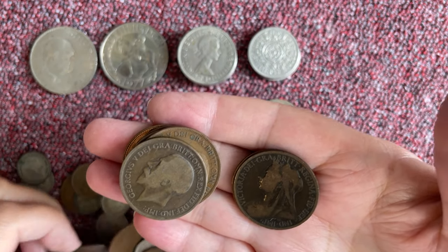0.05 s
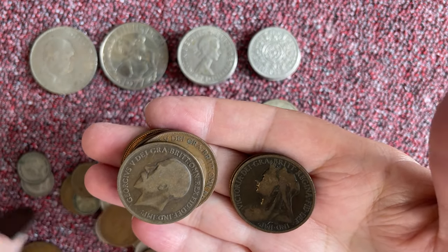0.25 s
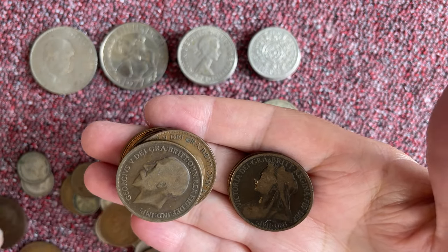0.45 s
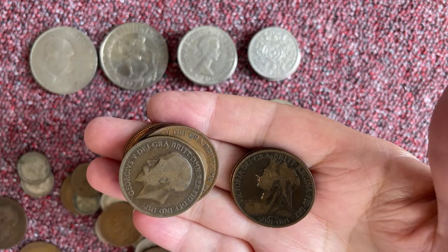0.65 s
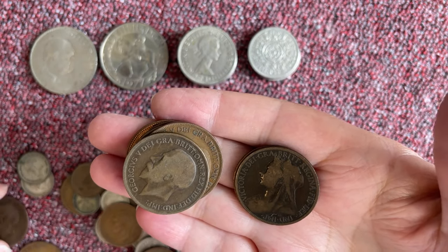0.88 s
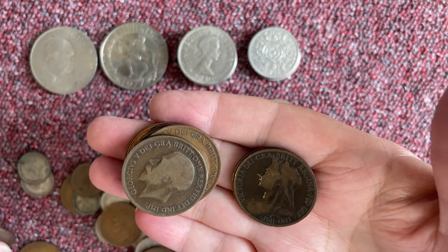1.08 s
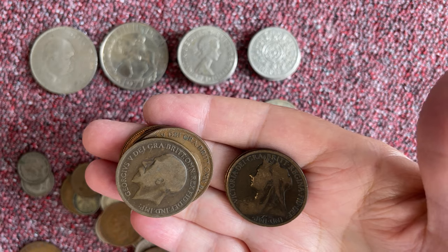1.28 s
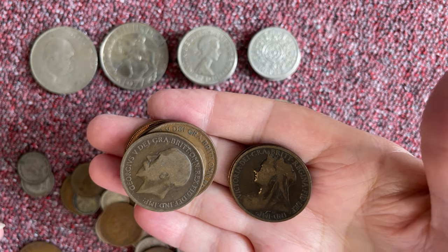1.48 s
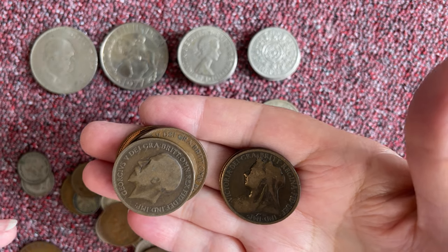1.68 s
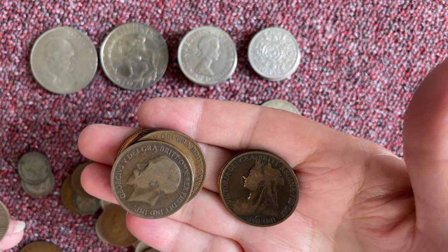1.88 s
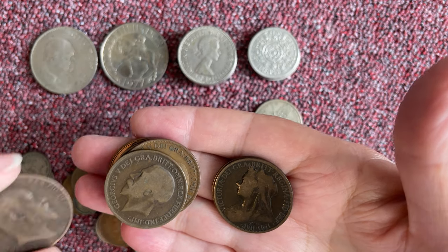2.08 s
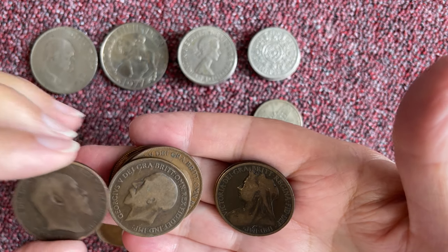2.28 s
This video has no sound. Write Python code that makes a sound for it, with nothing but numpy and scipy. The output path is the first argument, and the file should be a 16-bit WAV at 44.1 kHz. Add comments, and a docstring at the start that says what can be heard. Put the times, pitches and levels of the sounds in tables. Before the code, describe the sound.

Coins clink once, brightly, and settle as fingers slide a coin off a small heap. A hand bumps the carpet with two dull thuds, then faint handling ticks and rubs follow, close up in a quiet room.

```python
"""Penny off a coin heap

Fingers slide an old penny off a heap of coins on a carpet, close up in a quiet room. The heap slips
with one bright clink, and its coins stop each other as they settle. The freed penny rings faintly,
the hand bumps the carpet with two clear thuds, and a few handling ticks and rubs follow."""
import sys
import numpy as np
from scipy import signal
from scipy.fft import irfft
from scipy.io import wavfile

SR = 44100
rng = np.random.default_rng(int(sys.argv[2]) if len(sys.argv) > 2 else 0)


def put_to_file(sound):
    """Save the sound as 16-bit audio at rate SR, in the file named by the first command-line argument."""
    columns = np.atleast_2d(sound).T  # one column per channel
    safe = np.clip(columns, -1, 1)
    whole_steps = np.round(safe * 32767)
    wavfile.write(sys.argv[1], SR, whole_steps.astype(np.int16))


N = 108045
T = np.arange(N) / SR

# Modes of the four clinking coins, before each coin's trim: pitch_hz, level_db, t60_s
COIN_1_MODES = [(6735, -35, .22), (6983, -32, .2), (7120, -41, .15), (14392, -26, .06), (14728, -25, .22),
                (14796, -19, .35), (14987, -26, .12)]
COIN_2_MODES = [(8296, -41, .1), (8534, -34, .12), (11822, -28, .22), (12330, -21, .25), (12440, -32, .3),
                (12685, -32, .3), (12785, -35, .25), (15665, -26, .14)]
COIN_3_MODES = [(12292, -39, .3), (15390, -42, .3), (15462, -29, .35)]
COIN_4_MODES = [(11393, -49, .36), (12236, -43, .36), (12368, -37, .36), (12602, -47, .36),
                (12815, -48, .36)]
# Hard hits inside the heap: start_s, level_db, t60_s
HEAP_HITS = [(.2010, -56, .03), (0.2088, -36, .04), (0.2152, -15.5, .012), (0.2173, -14.5, 0.014),
             (0.2197, -20, .012), (0.2203, -19.5, 0.021), (0.2324, -27.5, .03), (0.2412, -27.5, .03),
             (.2485, -27, .02), (0.2544, -21.5, .04), (.2590, -27.5, .025), (.274, -42.5, .04),
             (0.288, -31, .03), (.2900, -38.5, .035), (.3990, -52, .012)]
# Their bright tone: freq_hz, gain_db
HEAP_HIT_EQ = [(100, -50.5), (350, -26.5), (700, -25), (1100, -30), (1700, -46), (2700, -37), (3900, -42),
               (5200, -27), (6100, -30.5), (6900, -11.5), (7800, -23), (9200, -12.5), (10000, -16),
               (11200, -15), (12400, -8.5), (13400, -12.5), (14800, -2.5), (16000, -10.5)]
# Modes of the penny: pitch_hz, relative_level_db, t60_s
PENNY_MODES = [(5324, -20, .7), (9265, 0, .32), (12205, -5, .3)]
# Light touches that leave it ringing: start_s, level_db, damped_after_s
PENNY_TAPS = [(.412, -69, 0.048), (.427, -63, 0.0048), (.485, -70, 0.059), (.5268, -58.5, 0.32)]
# Its rim catching as it slides: start_s, level_db
RIM_CATCHES = [(0.061, -54.5), (.0675, -59), (0.07, -56.5), (.080, -49), (0.089, -55), (0.0954, -58.5),
               (.103, -60.5), (0.1184, -43), (.1365, -44), (0.138, -46.5), (.1452, -42), (0.151, -42.5),
               (.167, -48), (0.171, -46), (.174, -51.5)]
# Their thin, metallic tone: freq_hz, gain_db
RIM_EQ = [(300, -20.5), (800, -7), (1500, -21.5), (4500, -32.5), (5400, -15), (6500, -35), (8000, -3),
          (8800, 1.5), (9250, 9), (9800, -8.5), (11000, -13), (12350, -1.5), (13300, -9.5), (16000, -23.5)]
# Soft blows on the carpet: start_s, relative_level_db
CARPET_BUMPS = [(0.218, -2), (.335, -23.5), (0.5132, -15.5), (0.5196, 8), (0.5587, -3.5), (.9830, -20.5)]
# Their dull tone: freq_hz, gain_db
BUMP_EQ = [(40, -44.5), (80, -37.5), (125, -3), (200, -12.5), (300, -0.5), (450, 3), (750, -2),
           (1050, -13.5), (1500, -40), (3000, -57), (16000, -83.5)]
# Fingernail and handling ticks: start_s, level_db, tilt_db_per_octave, top_hz
FINGER_TICKS = [(.1133, -48.5, -0.5, 16200), (0.115, -52, 7, 16100), (.131, -52, 0.5, 5000),
                (.1665, -48, 4, 14790), (0.369, -51.5, -2.5, 9900), (0.3747, -50, -0.5, 10200),
                (0.7764, -58, 4, 7530), (.8506, -47.5, 2, 6500), (0.941, -55, 1.5, 15000),
                (0.945, -57, 2, 15000), (0.9823, -47, -0.5, 15000), (0.986, -47, -3, 14270),
                (1.1956, -53, 1.5, 15000), (1.211, -66, -0.5, 11900)]
# Their tone before tilt and roll-off: freq_hz, gain_db
TICK_EQ = [(100, -7.5), (300, -2), (700, -0.5), (1200, -8.5), (1900, -8), (3000, -19.5), (6000, -14.5),
           (10000, -15.5), (16000, -13)]
# Skin sliding on metal: centre_s, half_length_s, level_db
SKIN_RUBS = [(.09, 0.051, -63.5), (.465, 0.049, -63.5), (.89, 0.098, -71.5), (1.185, 0.052, -66.5),
             (2.06, .05, -81.5)]
# Its hissy tone: freq_hz, gain_db
RUB_EQ = [(300, 7.5), (2000, -5.5), (4500, -10.5), (5600, -5), (7800, 5), (10500, 0), (14000, 0),
          (16000, -2)]
# The hand brushing the carpet: centre_s, half_length_s, level_db
CARPET_BRUSHES = [(.12, .04, -75), (.9, 0.11, -74.5), (2.36, 0.21, -75)]
# Its muffled tone: freq_hz, gain_db
BRUSH_EQ = [(100, -10), (400, -5.5), (1000, -3.5), (1800, -17.5), (5000, -26.5), (16000, -47.5)]
# Reverb decay by band: freq_hz, t60_s
REVERB_DECAY = [(100, 0.33), (400, 0.33), (1000, .22), (4000, 0.22), (12400, 0.18), (14500, 0.14),
                (16000, 0.1)]
# Reverb tone: freq_hz, gain_db
REVERB_EQ = [(100, 4.5), (1000, -0.5), (5000, 4), (7000, -4), (10000, 0), (12500, 0), (13600, -1),
             (14800, -3), (15700, -2.5)]
# Bass-heavy room air: freq_hz, gain_db
AIR_EQ = [(12, -31), (20, -3.5), (65, -4), (77, -0.5), (93, -22), (172, -12.5), (198, -29), (234, -16),
          (270, -25.5), (293, -19.5), (558, -25.5), (1150, -29.5), (1530, -32.5), (3740, -34.5),
          (16000, -35.5)]
# Wavering room hum: pitch_hz, level_db
HUM_TONES = [(59.5, -71), (120, -81), (174, -80.5)]


def heap_clink():
    """Four coins are set ringing, chatter against the heap and settle one after another."""
    clink_s = .2163
    out = np.zeros(N)
    for modes, trim_db, stop_s in [(COIN_1_MODES, -.5, .249), (COIN_2_MODES, 1, .262),
                                   (COIN_3_MODES, 4, .294), (COIN_4_MODES, -4, .386)]:
        add(out, clink_s, amp(trim_db) * coin_ring(modes, stop_s - clink_s, rise_s=.002, rattle=.5))
    for start_s, level_db, t60_s in HEAP_HITS:
        add(out, start_s, amp(level_db) * contact(HEAP_HIT_EQ, t60_s))
    return out


def sliding_penny():
    """The penny scrapes along, damped by a finger, then rings as it comes free."""
    out = np.zeros(N)
    for start_s, level_db in RIM_CATCHES:
        add(out, start_s, amp(level_db) * contact(RIM_EQ, t60_s=.018))
    for start_s, level_db, damped_after_s in PENNY_TAPS:
        add(out, start_s, amp(level_db) * coin_ring(PENNY_MODES, damped_after_s, rise_s=.00035))
    return out


def coin_ring(modes, damped_after_s, rise_s, rattle=0):
    """A coin rings until something chokes it; rattling against its neighbours roughens each mode."""
    t = T[:SR // 2]
    tone = np.zeros(len(t))
    for pitch_hz, level_db, t60_s in modes:
        partial = np.exp(2j * np.pi * (pitch_hz * t + rng.random()))
        roughness = 1 + rattle * flutter(width_hz=170, size=len(t))
        tone += amp(level_db) * fade(t, t60_s) * (partial * roughness).real
    attack = np.minimum(t / rise_s, 1)
    choke = fade(t - damped_after_s, t60_s=.014)
    return tone * attack * choke


def contact(eq, t60_s, tilt_db=0, top_hz=SR):
    """One hard touch: a fast-dying cluster of tiny impacts, all of one tone."""
    click = pulse(eq, tilt_db, top_hz)
    impacts = rng.choice([-1., 1.], len(click)) * fade(T[:len(click)], t60_s)
    return signal.fftconvolve(impacts, click / np.linalg.norm(click))


def pulse(eq, tilt_db=0, top_hz=SR):
    """A single sharp-fronted impact, shaped by an EQ, a tilt per octave and a top roll-off."""
    hz = abs(np.fft.fftfreq(4096, 1 / SR))
    shape_db = curve(eq, hz) + tilt_db * np.log2(hz / 1000 + 1e-2)
    gain = amp(shape_db) / (1 + (hz / top_hz) ** 8)
    minimum_phase = np.exp(np.conj(signal.hilbert(np.log(gain))))
    return np.fft.ifft(minimum_phase).real


def carpet_thuds():
    """Dull pushes on the carpet, each with one near reflection and a faint low ring."""
    boom_hz, echo_s, echo_db = 355, .0027, -7
    push = -amp(-1.5) * pulse(BUMP_EQ)
    boom = amp(-56) * np.sin(2 * np.pi * boom_hz * T) * fade(T, t60_s=.26)
    out = np.zeros(N)
    for start_s, level_db in CARPET_BUMPS:
        add(out, start_s, amp(level_db) * push)
        add(out, start_s + echo_s, amp(level_db + echo_db) * push)
        add(out, start_s, amp(level_db) * boom)
    return out


def handling():
    """Small finger ticks, plus grainy swells of skin on metal and of the hand on the carpet."""
    grain_db = 4.5
    out = np.zeros(N)
    for start_s, level_db, tilt_db, top_hz in FINGER_TICKS:
        add(out, start_s, amp(level_db) * contact(TICK_EQ, t60_s=.011, tilt_db=tilt_db, top_hz=top_hz))
    for strokes, eq in [(SKIN_RUBS, RUB_EQ), (CARPET_BRUSHES, BRUSH_EQ)]:
        flicker = unit(flutter(width_hz=250, size=N).real)
        grain = unit(amp(grain_db * flicker))
        envelope = sum(amp(level_db) * swell(centre_s, half_s) for centre_s, half_s, level_db in strokes)
        out += grain * noise(eq, N) * envelope
    return out


def room_reverb(send):
    """Tail of a small furnished room: sparse reflections whose treble dies first."""
    size, density, predelay_s = SR // 2, .1, .005
    reflections = rng.choice([-1., 1.], size) * (rng.random(size) < density) * (T[:size] > predelay_s)
    hz, t, bands = signal.stft(reflections, SR, nperseg=128)
    colour = amp(curve(REVERB_EQ, hz))[:, None]
    decay = np.exp(-np.log(1000) * t / curve(REVERB_DECAY, hz)[:, None])
    tail = signal.istft(bands * colour * decay, SR)[1]
    return signal.fftconvolve(send, tail / np.linalg.norm(tail))[:N]


def room_tone():
    """A bed of air and weak hum, with a low rumble while the hand moves."""
    hum = sum(amp(level_db) * wavering(pitch_hz, width_hz=2.5) for pitch_hz, level_db in HUM_TONES)
    rumble = amp(-60) * wavering(pitch_hz=65, width_hz=9) * swell(centre_s=.33, half_s=.16)
    air = amp(-65.5) * noise(AIR_EQ, N)
    return air + hum + rumble


def wavering(pitch_hz, width_hz):
    """A tone of rms 1 that drifts in level and phase."""
    hz = np.fft.rfftfreq(N, 1 / SR)
    return unit(irfft(random_phases(len(hz)) / (1 + ((hz - pitch_hz) / width_hz) ** 2), N))


def flutter(width_hz, size):
    """A smooth, complex-valued random modulator of rms about 1."""
    hz = np.fft.fftfreq(size, 1 / SR)
    wobble = np.fft.ifft(random_phases(size) / (1 + (hz / width_hz) ** 2))
    return wobble / wobble.std()


def noise(eq, size):
    """Noise of rms 1 shaped by an EQ."""
    hz = np.fft.rfftfreq(size, 1 / SR)
    return unit(irfft(random_phases(len(hz)) * amp(curve(eq, hz)), size))


def random_phases(size):
    """A flat spectrum with scrambled phase."""
    return np.exp(2j * np.pi * rng.random(size))


def swell(centre_s, half_s):
    """A bell-shaped rise and fall."""
    return np.exp(-((T - centre_s) / half_s) ** 2)


def fade(t, t60_s):
    """Holds until t = 0, then falls 60 dB every t60_s."""
    return np.exp(-np.log(1000) * np.maximum(t, 0) / t60_s)


def curve(points, hz):
    """Reads a table on a log-frequency axis."""
    freq_hz, values = np.transpose(points)
    return np.interp(np.log(hz + 1), np.log(freq_hz + 1), values)


def add(mix, start_s, sound):
    """Drops a sound into the mix on cue."""
    part = mix[round(start_s * SR):][:len(sound)]
    part += sound[:len(part)]


def amp(db):
    """Decibels to gain."""
    return 10 ** (np.asarray(db) / 20)


def unit(x):
    """Scales to rms 1."""
    return x / np.sqrt(np.mean(x ** 2) + 1e-20)


def scene():
    """A close mono mix with a little reverb, over the room tone."""
    bright = heap_clink() + sliding_penny() + handling()
    dull = carpet_thuds()
    reverb = room_reverb(amp(-13) * bright + amp(-16) * dull)
    return (bright + dull + reverb + room_tone())[None]


def record(dry):
    """The recorder's band limit: a steep high cut."""
    cutoff_hz = 15950
    high_cut = signal.firwin(255, cutoff_hz, window=("kaiser", 8), fs=SR)
    return signal.oaconvolve(dry, high_cut[None], "same")


dry = scene()
out = record(dry)
put_to_file(out)
```